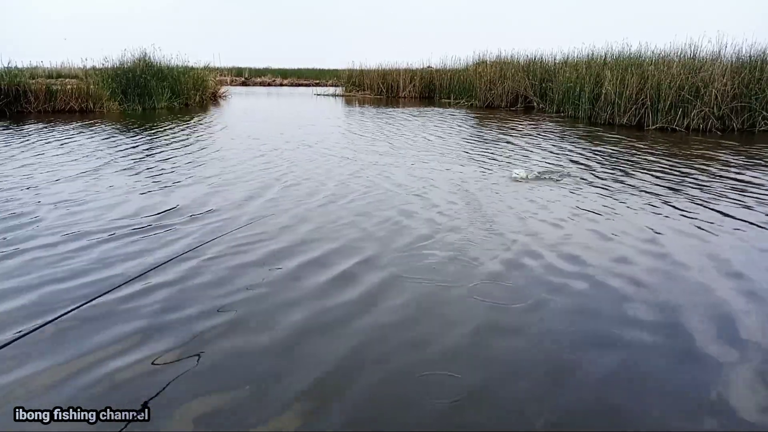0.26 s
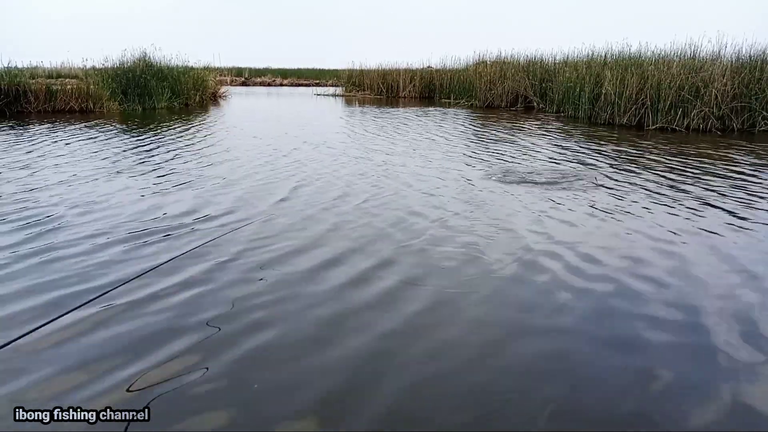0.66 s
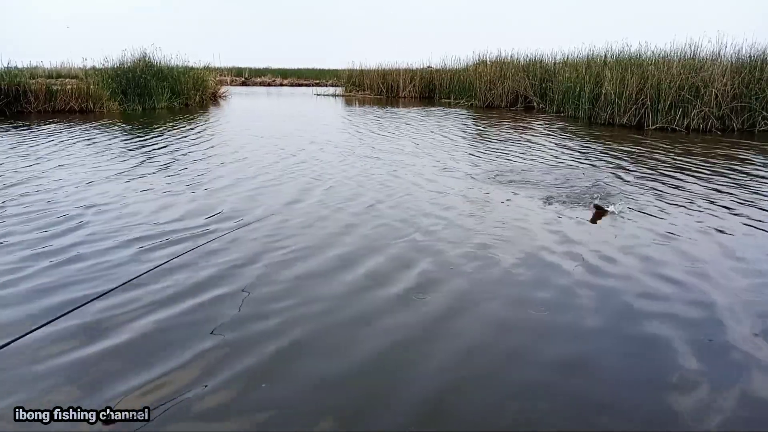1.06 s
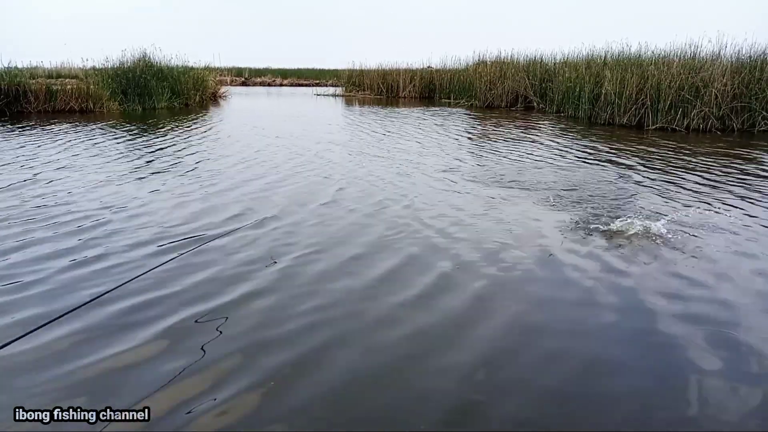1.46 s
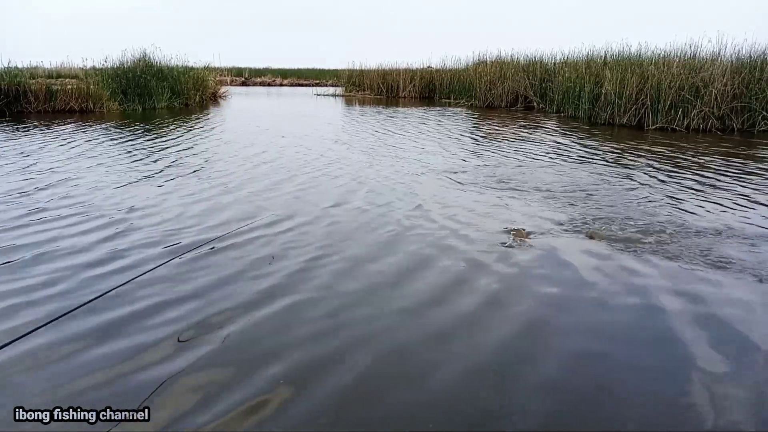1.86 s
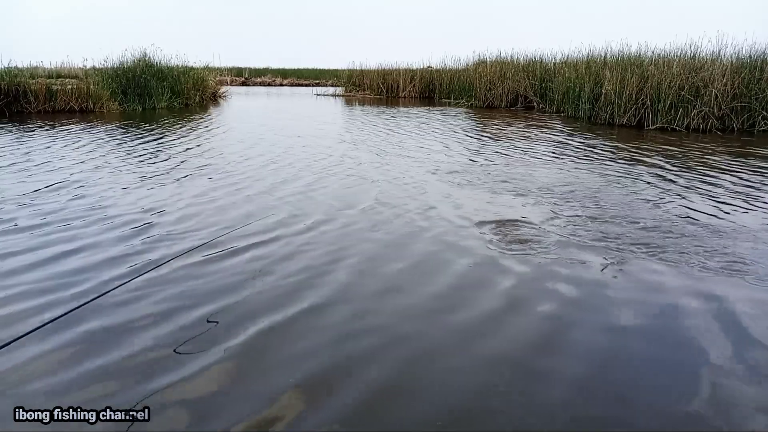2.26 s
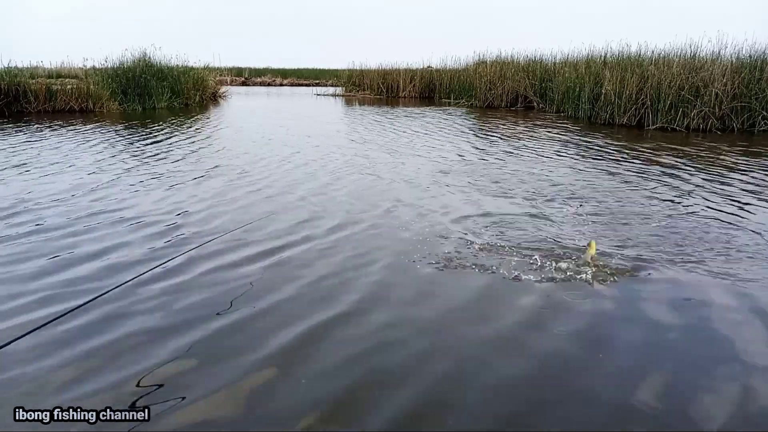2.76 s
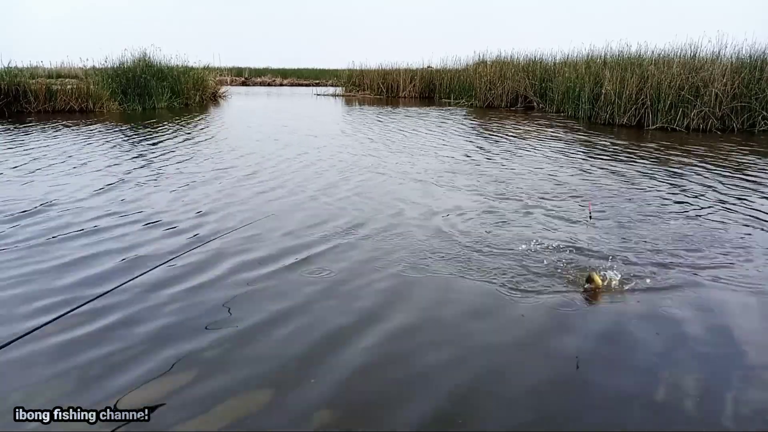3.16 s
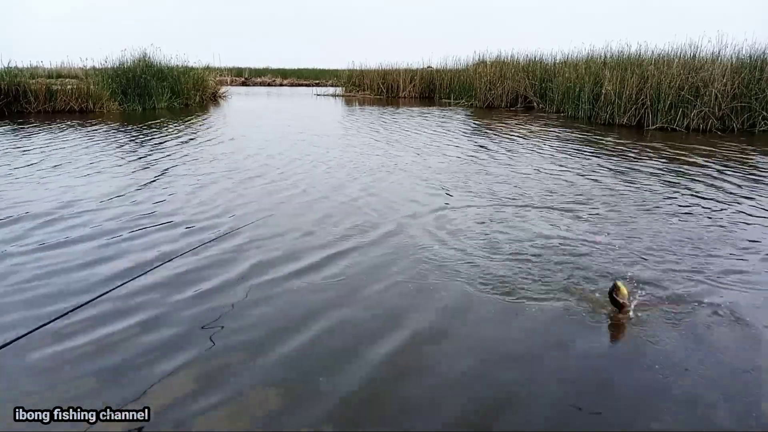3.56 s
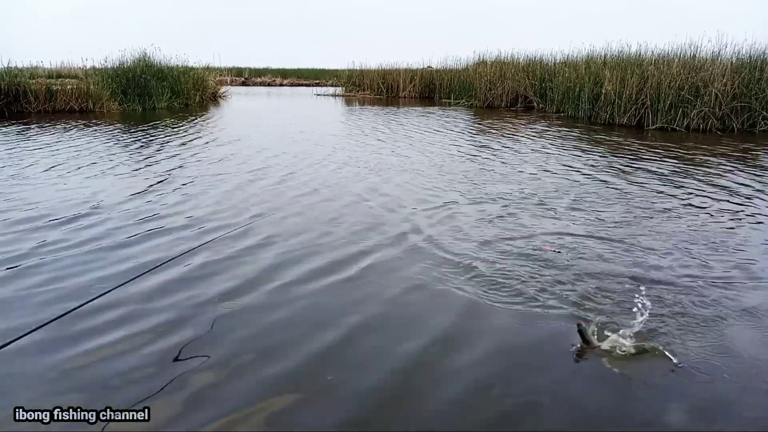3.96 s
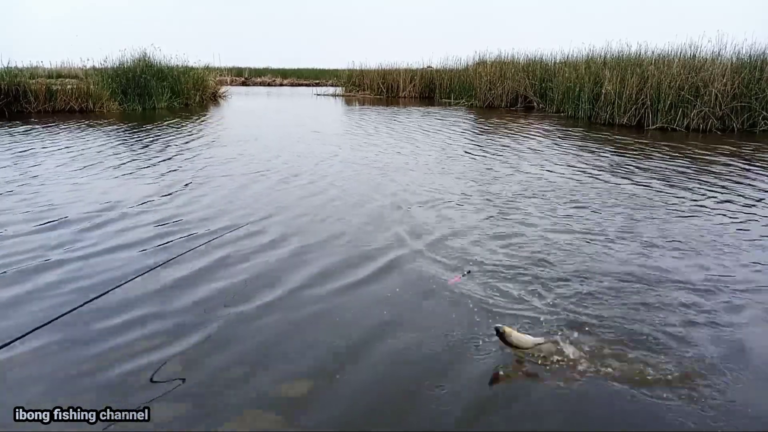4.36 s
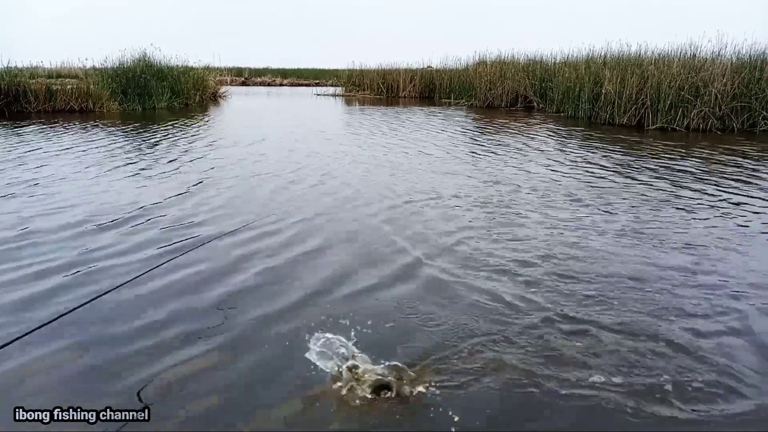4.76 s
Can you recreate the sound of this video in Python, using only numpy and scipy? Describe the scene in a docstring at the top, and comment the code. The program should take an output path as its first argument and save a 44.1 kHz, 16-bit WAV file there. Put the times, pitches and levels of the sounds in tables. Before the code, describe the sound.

Crisp splashes, gurgles and fizzing spray from a struggling fish grow nearer and denser over lumpy wind rumble, with a small motor puttering briefly.

```python
"""A pond, close to a small microphone: a hooked fish thrashes at the surface.
Its slaps trap ringing bubbles (sliding sines), crack the surface (noise bursts) and churn up
showers of small bubbles and spray. Wind rumbles on the microphone, reeds hiss, drops ping and
faint whistles slide; a distant one-cylinder engine (pulses ringing a pipe) revs up for a moment."""
import sys
import numpy as np
from scipy import signal
from scipy.fft import rfft, irfft, next_fast_len
from scipy.io import wavfile
from scipy.ndimage import uniform_filter1d

SR = 44100
rng = np.random.default_rng(int(sys.argv[2]) if len(sys.argv) > 2 else 0)


def bounce(signal):
    """Save signal as a 16-bit WAV file at the path given by the first command-line argument."""
    frames = np.transpose(np.atleast_2d(signal))
    limited = np.clip(frames, -1, 1)
    pcm = np.round(limited * 32767).astype(np.int16)
    wavfile.write(sys.argv[1], SR, pcm)


N = 221426


def gain_of(db):
    """Amplitude factor of a level in dB."""
    return 10 ** (np.asarray(db) / 20)


def evened(x):
    """Scales x to an RMS of 1."""
    return x / np.sqrt(np.mean(x ** 2) + 1e-20)


def smoothed_noise(shape, size):
    """Slow random drift of RMS 1: white noise averaged over size steps of the first axis."""
    return evened(uniform_filter1d(rng.standard_normal(shape), size=size, axis=0))


def read_spectrum(points, hz):
    """dB at each frequency, interpolated over log frequency; -100 outside the table."""
    point_hz, point_db = np.transpose(points)
    return np.interp(np.log(hz + 1), np.log(point_hz + 1), point_db, left=-100, right=-100)


def curves(rows, t):
    """Each column of a timed table, interpolated at the times t."""
    row_s, *columns = np.transpose(rows)
    return [np.interp(t, row_s, column) for column in columns]


def add(mix, start_s, sound):
    """Adds sound into mix, cut off at the end."""
    part = mix[round(start_s * SR):][:len(sound)]
    part += sound[:len(part)]


def colour(x, points):
    """Filters x by the gains of a table."""
    size = next_fast_len(len(x))
    gains = gain_of(read_spectrum(points, np.fft.rfftfreq(size, 1 / SR)))
    return irfft(rfft(x, size) * gains, size)[:len(x)]


def resonate(x, hz, width_hz):
    """One-pole complex resonance with a peak gain near 1."""
    radius = np.exp(-np.pi * width_hz / SR)
    return 2 * signal.lfilter([1 - radius], [1, -radius * np.exp(2j * np.pi * hz / SR)], x).real


def patches_of(white, bins, frames):
    """Level map of RMS 1: white noise smoothed over frequency bins, then time frames."""
    over_bins = uniform_filter1d(white, size=bins, axis=0)
    return evened(uniform_filter1d(over_bins, size=frames, axis=1))


def noise(points, size, patchy_db, tilt_db=0):
    """Random short-time spectra with drifting louder and softer patches; tilt in dB per octave over 100 Hz."""
    hop = size // 4
    hz, frames = np.fft.rfftfreq(size, 1 / SR), N // hop + 5
    a, b, white = rng.standard_normal((frames, len(hz), 3)).T
    patches = patches_of(white, bins=6, frames=8)
    octaves = np.log2(np.maximum(hz, 100) / 100)[:, None]
    tilt = np.interp(np.arange(frames) * hop, np.arange(N), tilt_db * np.ones(N))
    level_db = read_spectrum(points, hz)[:, None] + patchy_db * patches + tilt * octaves
    spectra = (a + 1j * b) * gain_of(level_db)
    return evened(signal.istft(spectra, nperseg=size, noverlap=size - hop)[1][:N])


def ring(hz, t60, rise_octaves, attack_s, sustain=1):
    """A bubble: a dying sine whose pitch slides; sustain is the power of time in the decay."""
    t60 = np.clip(t60, 0.003, 0.2)
    t = np.arange(0, t60, 1 / SR)
    turns = np.cumsum(hz * 2 ** (rise_octaves * t / t60)) / SR
    decay = gain_of(-60 * (t / t60) ** sustain)
    onset = (1 - np.exp(-t / attack_s)) ** 2
    return np.sin(2 * np.pi * turns) * decay * onset


# Air pockets shut in by the water. Each row: start in seconds, peak level in dB before the tremble,
# starting pitch in Hz, t60 in seconds, pitch rise in octaves over the ring.
AIR_POCKETS = [(0.009, -44, 2450, 0.022, 1), (0.011, -19.5, 595, 0.015, -0.5),
               (0.054, -28.5, 525, 0.063, 1), (0.083, -30, 566, 0.043, 3.5), (0.111, -26, 1600, 0.023, 0.2),
               (0.145, -29, 940, 0.037, 0.5), (0.146, -25.5, 646, 0.044, 0.8), (0.162, -20, 590, 0.056, 0),
               (0.164, -26, 1910, 0.018, 1.5), (0.166, -23.5, 805, .03, -0.5),
               (0.275, -40.5, 1017, .045, 0), (0.365, -39, 750, 0.061, 1.3),
               (0.682, -22, 1910, 0.0066, -0.6), (0.702, -31, 1170, 0.023, 1.5),
               (0.853, -45, 2650, 0.045, 1), (0.885, -43.5, 2700, 0.035, 0.5),
               (0.998, -27.5, 1170, 0.032, 2.5), (1.082, -23.5, 755, 0.05, 0), (1.206, -34, 1440, 0.053, 0),
               (1.231, -17.5, 1085, 0.011, -0.3), (1.247, -21, 1030, 0.025, 1.2),
               (1.264, -21, 1400, 0.015, 2.5), (1.305, -16.5, 1170, 0.0096, 2),
               (1.328, -31, 1500, .01, 0.8), (1.336, -10, 1200, 0.014, 1.2), (1.349, -22, 1000, 0.011, -1),
               (1.389, -24, 1110, 0.019, -0.5), (1.406, -26, 740, 0.07, 0),
               (1.425, -29.5, 1090, 0.031, 1.7), (1.457, -28.5, 645, 0.039, 2.5),
               (1.687, -40.5, 674, 0.079, 0.5), (1.69, -32, 2300, .018, 0.2),
               (1.737, -28, 2510, 0.012, 1.8), (1.824, -35, 972, 0.062, 0), (1.917, -43.5, 1853, 0.031, 0),
               (2.148, -45.5, 1072, 0.071, 0.7), (2.257, -43, 1843, 0.046, 0),
               (2.448, -25.5, 2500, 0.0085, -0.1), (2.452, -21.5, 980, 0.023, 0.8),
               (2.473, -13, 883, 0.032, 1.6), (2.474, -18, 1440, 0.013, 1.3),
               (2.496, -27.5, 1637, 0.032, 0.3), (2.604, -33, 1022, 0.074, 1.5),
               (2.632, -26, 446, 0.076, 0.5), (2.672, -32.5, 1790, 0.046, -0.1),
               (2.706, -40, 1820, 0.019, -0.5), (2.832, -38, 2220, 0.062, 0.4),
               (2.864, -24.5, 576, 0.094, 1.4), (2.918, -11.5, 1320, 0.0062, -0.2),
               (2.93, -28, 1050, 0.0052, 4), (3.057, -29.5, 1420, 0.026, 0),
               (2.986, -35.5, 2900, 0.014, 0.8), (3.078, -21.5, 1008, 0.029, -0.5),
               (3.128, -39.5, 1585, 0.06, 0), (3.223, -32.5, 2040, 0.047, 1),
               (3.245, -33, 1700, 0.023, 0.5), (3.282, -22.5, 920, 0.017, 0), (3.332, -25, 585, 0.033, 2.2),
               (3.35, -29.5, 1820, 0.018, 1.5), (3.376, -29, 1196, 0.029, 4), (3.383, -17, 1970, 0.008, 3),
               (3.387, -21, 1840, 0.016, -0.5), (3.413, -14.5, 2020, 0.0048, 1.5),
               (3.432, -25.5, 2170, 0.011, 0), (3.44, -21, 2300, 0.012, 2), (3.525, -44.5, 2440, 0.05, 0),
               (3.591, -31.5, 2800, 0.021, 0.5), (3.704, -31.5, 1850, 0.016, 0.6),
               (3.72, -37, 1400, 0.021, 1), (3.742, -25, 705, 0.041, 0.13),
               (3.816, -23.5, 930, 0.012, -2.5), (3.815, -24.5, 491, 0.057, 0.1),
               (3.842, -33, 900, 0.014, 0), (3.845, -27.5, 392, 0.08, 0.7), (3.877, -26, 1215, 0.034, 1),
               (3.892, -32, 1810, 0.015, 0.5), (3.915, -6.5, 1640, 0.011, 1),
               (3.946, -22, 1097, 0.027, 0.1), (3.97, -31, 757, 0.033, 2),
               (3.975, -18.5, 2140, 0.011, -0.5), (4.007, -29, 1900, 0.015, -1),
               (4.017, -28, 1166, 0.033, 1.7), (4.066, -28, 1960, 0.018, -2), (4.084, -32, 763, 0.072, 0),
               (4.216, -34.5, 2900, 0.014, 0.8), (4.261, -45, 1504, 0.056, 0),
               (4.284, -28.5, 2380, 0.017, 1.6), (4.388, -28, 2310, 0.018, 1.8),
               (4.443, -37, 2120, 0.021, 0.7), (4.484, -45, 3120, 0.027, 0.3), (4.503, -46, 840, .07, 2.5),
               (4.563, -28, 1175, 0.045, 1.1), (4.57, -26.5, 732, 0.039, 1.1),
               (4.592, -25.5, 650, 0.058, -0.2), (4.597, -24.5, 1045, 0.019, 0),
               (4.653, -18.5, 1210, 0.025, 0.3), (4.672, -22, 2520, 0.022, 1.2), (4.67, -28, 625, 0.014, 0),
               (4.69, -23, 670, 0.013, -1), (4.702, -24.5, 600, 0.016, 0), (4.789, -22, 3050, 0.0061, 0),
               (4.848, -24, 855, 0.05, 3), (4.859, -17, 800, 0.013, 0), (4.872, -23, 2130, 0.013, 0.2),
               (4.913, -12.5, 1220, 0.0093, 1.15), (4.977, -33, 2541, 0.014, 0),
               (5.002, -20.5, 2780, 0.0063, 0), (5.0135, -19.5, 2590, 0.012, 0.5)]


def bubbles():
    """Each air pocket rings once, its wall trembling a little."""
    out = np.zeros(N)
    for start_s, db, hz, t60, rise_octaves in AIR_POCKETS:
        sound = ring(hz, t60, rise_octaves, attack_s=0.043 * t60, sustain=0.97)
        add(out, start_s, gain_of(db) * sound / abs(sound).max())
    return out * (1 + 0.22 * smoothed_noise(N, size=60))


# Cracks of tail and drops on the surface. Each row: start in seconds, peak level in dB without the tick,
# centre in Hz, slap in dB RMS against the bright noise, t60 in seconds.
SURFACE_CRACKS = [(0.0197,-27.5,6380,-25,0.017),(0.1265,-22,5960,-14,0.0085),(0.134,-26,7200,-10,0.01),(0.1547,-22,7250,-11,0.0098),(0.165,-25,5200,-10,0.01),(0.21,-25,7500,-13,0.01),(0.27,-23.5,7250,-13,0.012),(0.282,-27,6200,-13,.008),(0.3103,-21.5,4670,-4.5,0.0048),(0.324,-27,2600,9,0.0049),(0.415,-28,6750,-35,0.028),(0.434,-32,7000,-28,0.015),(0.6644,-22,7270,0,0.009),(0.7093,-32,4200,-7,.012),(0.7154,-26,6540,-3,0.0086),(0.8452,-32,3530,-24,0.0089),(0.9169,-13,6480,-38,0.0096),(0.9375,-22,3700,-16,0.009),(0.94,-20,5700,-23,0.011),(1.0084,-19,7100,-16,0.004),(1.0814,-22,4130,10,0.026),(1.127,-31.5,3200,-22,0.0099),(1.168,-26,2580,-23,0.0073),(1.18,-29,3300,-11,0.008),(1.2244,-21,6260,-9,0.0097),(1.2437,-12.5,4230,4.5,0.0083),(1.251,-18,4500,-2,0.0088),(1.261,-14.5,4130,-14,0.0075),(1.3041,-16,4200,-5,0.011),(1.3102,-11,5390,-7,0.012),(1.316,-16,2490,-4,0.011),(1.376,-19,7480,-10,0.015),(1.387,-23,4600,8,.009),(1.403,-27,3370,-11,0.0078),(1.4154,-19.5,3200,9,0.011),(1.444,-24,7550,-12,0.008),(1.4529,-20.5,3820,-6,0.0066),(1.495,-27,5140,-16,0.0088),(1.5392,-29,3100,-25,0.0088),(1.6293,-27,6110,-26,0.0064),(1.657,-17.5,3800,-37,0.012),(1.675,-23.5,6170,-19,0.014),(1.695,-17,6000,-9,0.021),(1.726,-16,5010,-39,0.014),(1.8923,-31.5,4300,-26,0.0064),(1.907,-27,6650,-25,0.011),(1.9676,-32.5,6740,-29,.008),(2.003,-36,7900,-35,.012),(2.068,-25.5,6380,-28,0.0051),(2.217,-24,7424,-25,0.0091),(2.237,-26,7240,-21,0.014),(2.2881,-20,6870,-21,0.0099),(2.3304,-26,6120,-32,0.0099),(2.375,-34,7350,-26,.008),(2.4493,-21,2700,-17,0.0056),(2.4793,-25,6030,-14,0.0065),(2.484,-28,4540,-20,.009),(2.522,-33,6600,-18,0.013),(2.5933,-27,3250,-23,0.012),(2.6309,-12.5,4800,0,0.0056),(2.6694,-21.5,4830,-19,0.01),(2.674,-30,7650,-25,.009),(2.685,-31,7300,-28,.008),(2.7065,-25,6080,-20,.006),(2.7717,-30,7230,-20,0.0077),(2.833,-27,6440,-15,.006),(2.844,-25,6300,-21,.005),(2.8823,-5,6470,-9.5,0.0055),(2.8826,-8.5,4430,-11.5,0.0065),(2.895,-27,5500,-11,.008),(2.906,-28,5600,-10,.006),(2.914,-29,3500,-6,.006),(2.9367,-28,6210,-11,.007),(2.9575,-14.5,5350,-10,.005),(2.9644,-9,6580,-9,0.0083),(3.0748,-26,6340,3,.006),(3.14,-26.5,6600,-25,0.0096),(3.2218,-23,5940,-21,0.0061),(3.2272,-20.5,4640,-15,0.011),(3.248,-14,3950,-24,0.014),(3.2822,-9,5500,-6,0.0042),(3.2849,-4.5,6330,-12,0.0056),(3.338,-13.5,7420,3,0.0067),(3.355,-27,5000,-11,.005),(3.3642,-23.5,4400,-8,0.0076),(3.4102,-18.5,5270,-4,0.0064),(3.436,-15.5,3450,-24,0.0057),(3.4405,-19.5,5540,-11,0.0071),(3.449,-22.5,3800,-18,.006),(3.5462,-25,5130,-24,0.0067),(3.5742,-30,4230,-25,0.0085),(3.602,-31.5,7400,-31,.012),(3.674,-35,7500,-19.5,0.012),(3.736,-20.5,7350,-28,0.013),(3.768,-23,7360,-27,0.0068),(3.79,-24.5,5800,-22,0.0089),(3.8117,-19,6700,-26,0.0071),(3.826,-29,7200,-30,0.0065),(3.9152,-10.5,4720,2,0.0078),(3.9446,-15,7000,-13,0.011),(3.98,-25,3260,-13,.007),(4.0296,-10.5,3970,-24,0.0054),(4.087,-18,7250,-21,.007),(4.101,-9,7460,-9,0.011),(4.1407,-15.5,7580,-47,0.017),(4.1967,-24,5220,-14,0.016),(4.2046,-25,5960,-3,0.011),(4.2757,-13.5,5470,-16.5,0.012),(4.366,-30.5,5360,-33,0.014),(4.385,-27.5,5900,-25,0.0083),(4.4277,-33.5,6000,-22,0.01),(4.4827,-39,5960,-18,.008),(4.5194,-25,5500,-23,0.0075),(4.5238,-20,5050,-23,0.0076),(4.5444,-25,6600,-4,0.0078),(4.568,-22,3050,-11,.008),(4.58,-19.5,6230,-14,0.0075),(4.596,-21.5,4640,-13,0.0065),(4.6425,-19,5380,-8,0.011),(4.645,-15,3400,-11,0.012),(4.682,-18,7300,-22,0.012),(4.7068,-10.5,6000,-1.5,0.0059),(4.7316,-29,3110,-18,0.006),(4.7594,-26,4070,-16,.008),(4.767,-21,6400,-6,0.0061),(4.8267,-17.5,4700,-22,0.01),(4.845,-8.5,2820,-8,0.0063),(4.852,-17,6050,-14,.006),(4.8795,-23,6000,-17,.008),(4.9084,-18,6290,-10,0.0074),(4.9119,-19.5,6500,-3,0.0076),(4.919,-18.5,6260,-22,.007),(4.9556,-23.5,5900,-24,0.007),(4.968,-17,4940,-19,.009),(4.9872,-18.5,5900,-5,0.0099)]
TICK_DB, TICK_T60_S = -23.5, 0.0015  # broad first tick; its level adds to the crack's
DROP_DB, DROP_RISE_OCTAVES = -5.5, 0.11  # trapped bubble, RMS against the bright noise


def cracks():
    """Noise gone in milliseconds: bright at its centre, where a tiny bubble rings, over a duller slap."""
    out, t = np.zeros(N), np.arange(1500) / SR
    bursts = rng.standard_normal((len(SURFACE_CRACKS), len(t)))
    for (start_s, db, hz, slap_db, t60), burst in zip(SURFACE_CRACKS, bursts):
        u = t / np.clip(t60, 0.003, 0.03)
        shape = gain_of(-60 * u) * (1 - np.exp(-t / 0.00033)) ** 2
        bright = resonate(resonate(burst, hz, width_hz=1730), hz, width_hz=1730)
        turns = np.cumsum(hz * 2 ** (DROP_RISE_OCTAVES * np.minimum(u, 1))) / SR
        drop = np.sin(2 * np.pi * turns)
        slap = resonate(resonate(burst, hz=2160, width_hz=1500), hz=2160, width_hz=1500)
        tick = gain_of(TICK_DB - 60 * t / TICK_T60_S) * burst
        add(out, start_s, gain_of(db) * tick)
        body = evened(bright) + gain_of(DROP_DB) * evened(drop) + gain_of(slap_db) * evened(slap)
        crack = body * shape
        add(out, start_s, gain_of(db) * crack / abs(crack).max())
    return out


# Thrashes of the fish. Each row: start in seconds, length in seconds, then the levels of
# glug, gurgle, spray and fizz in dB before sag and clumping.
FISH_THRASHES = [(0.0, 0.11, -39.5, -45, -48, -49), (0.012, 0.0094, -52, -54, -38, -37),
                 (0.1, 0.07, -38, -38, -41.5, -37), (0.19, 0.17, -47, -44.5, -48, -46.5),
                 (0.64, 0.25, -68, -57, -51.5, -47.5), (0.905, 0.1, -59, -53, -45.5, -40.5),
                 (1.022, 0.045, -57, -58, -53, -42.5), (1.071, 0.061, -56, -51, -45, -46.5),
                 (1.164, 0.049, -49, -44.5, -46.5, -41), (1.225, 0.041, -44, -30, -35, -28),
                 (1.296, 0.058, -52, -40, -42.5, -35.5), (1.371, 0.16, -43.5, -41.5, -39, -36.5),
                 (1.611, 0.05, -72, -62, -48, -52), (2.433, 0.31, -44.5, -50.5, -49.5, -43.5),
                 (2.58, .12, -49, -54, -42, -38), (2.803, 0.15, -59, -61, -48, -45),
                 (2.852, .03, -37, -38.5, -42, -51.5), (2.877, 0.11, -36, -39.5, -55, -54),
                 (2.993, 0.17, -44.5, -50, -53.5, -55), (3.215, 0.065, -75, -42.5, -48, -38),
                 (3.285, 0.17, -44.5, -42.5, -45, -40.5), (3.532, 0.057, -64, -63, -52.5, -46),
                 (3.7, 0.091, -54, -68, -51.5, -56), (3.785, 0.12, -50, -70, -54.5, -44.5),
                 (3.892, 0.084, -61, -36, -44, -40), (3.971, 0.15, -43, -41.5, -40.5, -37.5),
                 (4.168, 0.17, -63.5, -57, -52.5, -51), (4.524, 0.064, -43, -39, -37.5, -35),
                 (4.556, 0.059, -34, -36, -41, -45), (4.635, 0.08, -36.5, -34, -31.5, -34),
                 (4.739, 0.074, -53, -38, -37, -36.5), (4.83, 0.057, -47, -44, -36, -39.5),
                 (4.896, 0.016, -43, -33.5, -34, -36.5), (4.951, 0.08, -44.5, -45.5, -39, -39)]
# Trickle under the thrashes: levels of glug, gurgle, spray and fizz in dB before clumping.
TRICKLE_DB = (-66.5, -70.5, -70.5, -57.5)
SWELL_S, SAG_DB_PER_S, SETTLE_DB_PER_S = 0.012, 20.5, 407.5


def agitation():
    """Gains of the four bubble sizes: each thrash swells fast, sags and settles; powers add."""
    power = np.outer(gain_of(TRICKLE_DB) ** 2, np.ones(N))
    for start_s, length_s, *levels_db in FISH_THRASHES:
        t = np.arange(0, length_s + 60 / SETTLE_DB_PER_S, 1 / SR)
        fall_db = SAG_DB_PER_S * t + SETTLE_DB_PER_S * np.maximum(t - length_s, 0)
        shape = np.minimum(t / SWELL_S, 1) * gain_of(-fall_db)
        add(power.T, start_s, np.outer(shape, gain_of(levels_db)) ** 2)
    return np.sqrt(power)


def grains(low_hz, high_hz, cycles, per_s, spread_db, count=24, onset_cycles=0.3):
    """A shower of tiny bubbles of mixed pitch and level; a few are much louder."""
    chance, luck, pick = rng.random((N, 3)).T
    at = np.flatnonzero(chance < per_s / SR)
    size = gain_of(spread_db * np.minimum(-np.log(1 - luck[at]), 5))
    kind, out = (pick[at] * count).astype(int), np.zeros(N)
    for k, hz in enumerate(np.geomspace(low_hz, high_hz, count)):
        t60 = cycles * rng.uniform(1.0, 1.6) / hz
        shape = ring(hz, t60, rng.uniform(0, 0.7), attack_s=onset_cycles / hz)
        places = at[kind == k, None] + np.arange(len(shape))
        sounds = np.outer(size[kind == k], shape / np.linalg.norm(shape))
        out += np.bincount(places.ravel(), sounds.ravel(), minlength=N)[:N]
    return out


def mottle(x, patchy_db):
    """Louder and softer patches over time and frequency."""
    spectra = signal.stft(x, nperseg=256, noverlap=192)[2]
    patches = patches_of(rng.standard_normal(spectra.T.shape).T, bins=4, frames=24)
    return evened(signal.istft(spectra * gain_of(patchy_db * patches), nperseg=256, noverlap=192)[1][:N])


def clumps(per_s, fade_s, floor):
    """Sheets of water fall back in lumps: sudden starts that fade."""
    starts = rng.uniform(0.099, 1, N) * (rng.random(N) < per_s / SR)
    lumps = signal.lfilter([1], [1, -np.exp(-1 / (fade_s * SR))], starts)
    return evened(floor + evened(lumps))


# Filters on the four bubble showers. Each row: frequency in Hz, relative gain in dB.
GLUG_FILTER = [(240, -37), (420, -9.5), (640, -6), (900, -4.5), (1300, -5.5), (1900, -31.5)]
GURGLE_FILTER = [(800, -36), (1250, -18), (1590, -7.5), (2080, -9.5), (3600, -13), (5200, -33),
                 (8800, -100)]
SPRAY_FILTER = [(1800, -8), (2500, -11.5), (3500, -8), (5000, -4.5), (6200, -27)]
FIZZ_FILTER = [(4300, -27.5), (5500, -7), (6500, -3.5), (7600, -4), (8800, -11.5)]
PLINK_DB, PLINK_FLOOR_DB = -7, -71.5  # lone bubbles: against glug and gurgle, and a constant floor
SPATTER_DB = -16  # stray droplets, against the spray gain


def churn():
    """Glug, gurgle, spray and fizz come from ever smaller bubbles as the fish thrashes."""
    glug = colour(grains(416.7, 1510, cycles=28, per_s=330, spread_db=1.5), GLUG_FILTER)
    glug = mottle(glug, patchy_db=2.0)
    gurgle = colour(grains(1100, 3700, cycles=46, per_s=600, spread_db=2.0), GURGLE_FILTER)
    gurgle = mottle(gurgle, patchy_db=3.0)
    spray = colour(grains(2200, 6700, cycles=26, per_s=1500, spread_db=3.0), SPRAY_FILTER)
    spray = mottle(spray, patchy_db=3.5)
    fizz = colour(grains(4800, 8280, cycles=37, per_s=1400, spread_db=3.0), FIZZ_FILTER)
    fizz = mottle(fizz, patchy_db=4.5)
    low_plinks = evened(grains(500, 1300, cycles=63, per_s=80, spread_db=3.0))
    high_plinks = evened(grains(1300, 3200, cycles=68, per_s=100, spread_db=4.0))
    gains = agitation()
    showers = (gains * [glug, gurgle, spray, fizz]).sum(axis=0)
    water = showers * clumps(per_s=75, fade_s=0.013, floor=0.57)
    plink_gains = gain_of(PLINK_DB) * gains[:2] + gain_of(PLINK_FLOOR_DB)
    plinks = (plink_gains * [low_plinks, high_plinks]).sum(axis=0)
    spatter = evened(grains(2500, 7500, cycles=3.5, per_s=350, spread_db=1.0, count=8))
    return water + plinks + gain_of(SPATTER_DB) * gains[2] * spatter


def drips():
    """Scattered drops run off fish, line and reeds all the time: tiny high pings."""
    pings = grains(6300, 7900, cycles=60, per_s=40, spread_db=2.5, count=8, onset_cycles=4)
    return gain_of(-60) * evened(pings)


def reed_echo(x, delay_s, t60):
    """Scattered faint returns from the water and the reed bank: sparse random taps that die away."""
    t = np.arange(3000) / SR
    taps = rng.standard_normal(len(t)) * (rng.random(len(t)) < 0.05) * gain_of(-60 * t / t60)
    delayed = np.pad(x, (round(delay_s * SR), 0))
    return signal.oaconvolve(delayed, taps / np.linalg.norm(taps))[:N]


# Engine run. Each row: time in seconds, firings per second, pulse level in dB before the final scaling.
ENGINE_RUN = [(1.341, 16, -60), (1.43, 16.8, -24.5), (1.52, 22.43, -34), (1.61, 27.1, -25.5),
              (1.7, 29.2, -27), (1.95, 29.4, -26.5), (2.09, 29.5, -27), (2.16, 29.4, -24),
              (2.24, 18.8, -37.5), (2.3, 17.4, -38)]
# Exhaust pipe modes. Each row: frequency in Hz, width in Hz, drive in dB before division by the width.
PIPE_MODES = [(161, 57, 12), (278, 16, -13.5), (480, 110, -14.5), (590, 90, -14.5)]


def engine():
    """One pressure pulse a firing, with a noisy puff, ringing the exhaust pipe."""
    t = np.arange(N) / SR
    firings_per_s, db = curves(ENGINE_RUN, t)
    heard = (t > ENGINE_RUN[0][0]) & (t < ENGINE_RUN[-1][0])
    firings = np.ceil(np.cumsum(firings_per_s * heard) / SR)
    pulses = -np.diff(firings, prepend=0) * gain_of(db + 0.57 * rng.standard_normal(N))
    puff_shape = signal.lfilter([1], [1, -np.exp(-1 / (0.0062 * SR))], pulses)
    pulses = pulses + gain_of(-31.0) * rng.standard_normal(N) * puff_shape
    uneven = smoothed_noise((N, len(PIPE_MODES)), size=1500).T  # no two firings ring alike
    pipe = np.zeros(N)
    for (hz, width_hz, mode_db), drift in zip(PIPE_MODES, uneven):
        pipe += resonate(pulses * gain_of(mode_db + 0.81 * drift), hz, width_hz) / width_hz
    # the silencer holds back the treble
    pipe = signal.sosfilt(signal.cheby2(6, 36, 760, fs=SR, output="sos"), pipe)
    target = np.std(gain_of(db[heard]) * np.sign(pipe[heard]))
    return pipe * target / np.std(pipe[heard])


# Wind on the microphone. Each row: time in seconds, rumble gain in dB,
# brightening in dB per octave above 100 Hz (which also lifts the level).
WIND_COURSE = [(0.0, -32.5, 6), (0.15, -27, 0.5), (0.5, -26.5, 1), (1.0, -27.5, 2), (1.3, -28, 3),
               (1.5, -25, 1), (2.2, -29, 2.5), (2.3, -22.5, 0.5), (2.5, -27, 2.5), (2.75, -24, 7),
               (3.1, -25.5, 7.5), (3.35, -24, 1), (3.6, -27.5, 6), (3.95, -22, -2), (4.3, -28.5, 4),
               (4.55, -24.5, 0.5), (5.02, -28.5, 5)]
# Rumble spectrum before brightening. Each row: frequency in Hz, relative density in dB per Hz.
RUMBLE_SPECTRUM = [(12, -72), (20, -55), (47, -13.5), (69, 1.5), (156, -5), (183, -11.5), (244, -14.5),
                   (341, -23), (447, -35), (524, -38), (900, -61), (1170, -79), (1980, -120)]
# One knock of wind on the microphone: start in seconds, level of the sine in dB, pitch in Hz.
KNOCK = (3.869, -11, 125.5)
KNOCK_S = 0.025


def wind():
    """Lumpy low noise whose level and brightness wander, and one knock: a short swelling sine."""
    db, tilt_db = curves(WIND_COURSE, np.arange(N) / SR)
    out = gain_of(db) * noise(RUMBLE_SPECTRUM, size=2048, patchy_db=1.5, tilt_db=tilt_db)
    start_s, knock_db, hz = KNOCK
    t = np.arange(0, KNOCK_S, 1 / SR)
    swell = np.sqrt(np.sin(np.pi * t / KNOCK_S))
    add(out, start_s, -gain_of(knock_db) * np.sin(2 * np.pi * hz * t) * swell)
    return out


# Faint far whistles, perhaps a bird. Each row: start in seconds, length in seconds,
# level in dB before fades, start in Hz, end in Hz.
FAR_WHISTLES = [(2.112, 0.2, -56, 2800, 2460), (2.27, 0.15, -62, 1800, 1850)]


def whistles():
    """A thin, blurred tone that flickers as it slides, fastest at first."""
    out = np.zeros(N)
    for start_s, length_s, db, from_hz, to_hz in FAR_WHISTLES:
        u = np.arange(0, length_s, 1 / SR) / length_s
        a, b = smoothed_noise((len(u), 2), size=220).T
        turns = np.cumsum(from_hz + (to_hz - from_hz) * u ** 0.2) / SR
        blurred = (0.3 + a) * np.sin(2 * np.pi * turns) + b * np.cos(2 * np.pi * turns)
        add(out, start_s, gain_of(db - 3.5 * u) * np.sqrt(np.sin(np.pi * u)) * evened(blurred))
    return out


# Hiss of the reeds. Each row: frequency in Hz, relative density in dB per Hz.
REED_SPECTRUM = [(300, -18), (500, 2.5), (1000, -10), (2400, -0.5), (4000, -8), (6500, -16), (9000, -11.5)]


def reeds():
    """Steady, patchy noise of the reeds."""
    return gain_of(-65) * noise(REED_SPECTRUM, size=512, patchy_db=3)


def scene():
    """Fish, echoes and background summed to one channel."""
    hiss = reeds()
    hits, motor = bubbles() + cracks(), engine()
    hit_echo = gain_of(-10.0) * reed_echo(hits, delay_s=0.0022, t60=0.078)
    motor_echo = gain_of(-6.5) * reed_echo(motor, delay_s=0.00809, t60=0.12)
    fish = hits + hit_echo + churn() + drips()
    return (fish + motor + motor_echo + whistles() + wind() + hiss)[None]


def record(dry):
    """The microphone drops the deepest bass and the treble above 8 kHz; then the band limit."""
    thin = signal.sosfilt(signal.butter(3, 42, "high", fs=SR, output="sos"), dry)
    dull = signal.sosfilt(signal.cheby2(10, 50, 8900, fs=SR, output="sos"), thin)
    band_limit = signal.firwin(511, 9033, window=("kaiser", 9), fs=SR)
    return signal.oaconvolve(dull, band_limit[None], "same")


dry = scene()
out = record(dry)
bounce(out)
```